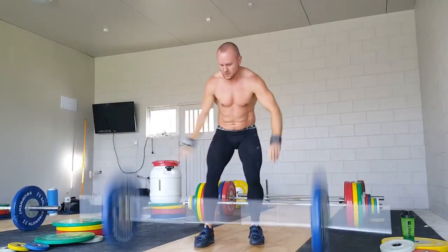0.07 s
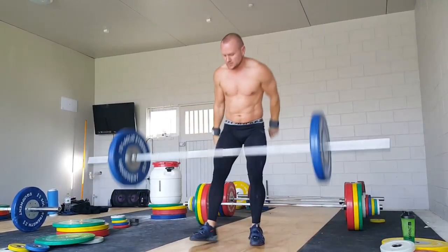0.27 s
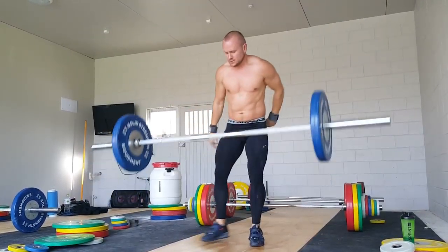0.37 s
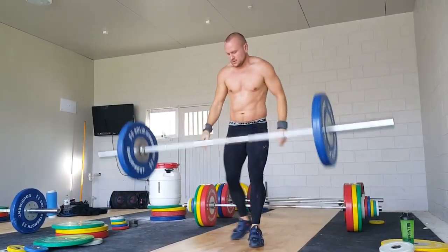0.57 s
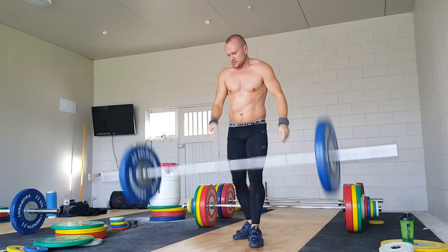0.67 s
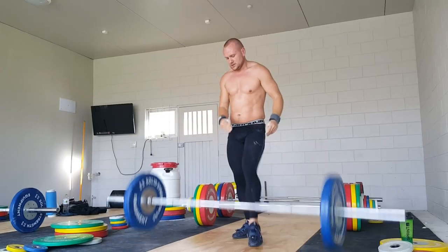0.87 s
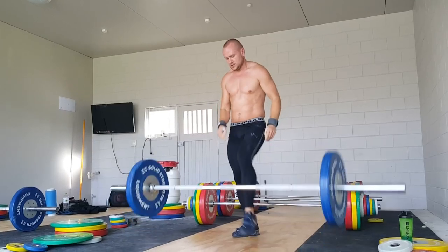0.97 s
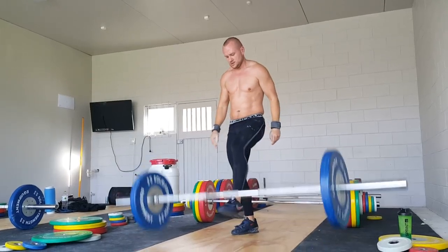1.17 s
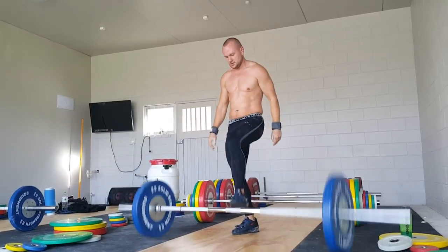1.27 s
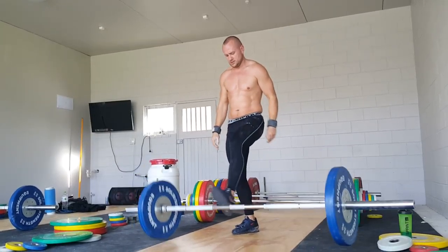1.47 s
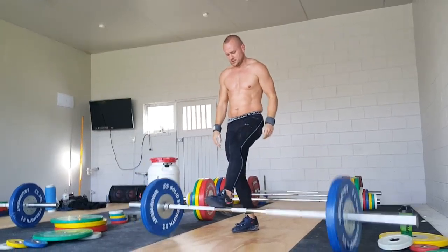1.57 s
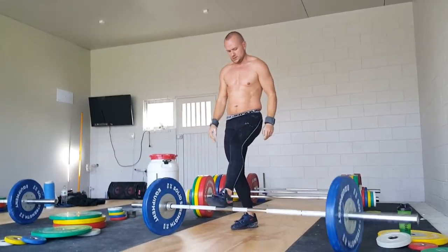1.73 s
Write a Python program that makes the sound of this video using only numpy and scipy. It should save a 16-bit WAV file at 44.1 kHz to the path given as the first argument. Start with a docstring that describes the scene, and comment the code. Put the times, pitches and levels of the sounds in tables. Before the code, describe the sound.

Loaded barbell crashes down on a wooden gym floor, steel sleeves clanging through shrinking bounces in a ringing room

```python
"""In a hard-walled gym, an earlier noise fades away over a lumpy low rumble and steady air.
A barbell with rubber plates then lands on a wooden platform: a low push of dying tones and a swelling boom.
Right after, the loose steel sleeves clatter and clang, made of random knocks and ringing filters; the room rings on.
The bar bounces three times, each with its own thud and clatter, and then rolls with sharp ticks and thin rings.
A small two-port microphone hears it all, and its gain control turns loud moments down and recovers slowly."""
import sys
import numpy as np
from scipy import signal
from scipy.fft import rfft, irfft
from scipy.io import wavfile
from scipy.ndimage import uniform_filter1d

SR = 44100
rng = np.random.default_rng(int(sys.argv[2]) if len(sys.argv) > 2 else 0)


def unload_wav(signal):
    """Save mono or channel-first audio to the path in sys.argv[1] as 16-bit WAV at rate SR, clipped to [-1, 1]."""
    wavfile.write(
        sys.argv[1],
        SR,
        np.round(np.clip(np.atleast_2d(signal).T, -1, 1) * 32767).astype(np.int16),
    )


N = 103105
TIME = np.arange(N) / SR  # seconds

# Background colour. Each row: frequency in Hz, relative level in dB per Hz.
RUMBLE_COLOUR = [(15, -40), (32, -7.5), (48, -20), (65, 1), (85, -5), (120, -7.5), (160, -8.5), (250, -13),
                 (390, -18), (500, -28), (3160, -70), (5000, -33.5), (16000, -51)]
# Loudness of the rumble over time. Each row: time in seconds, level in dB.
RUMBLE_LEVEL = [(0, -30), (.15, -26), (.22, -16.5), (.3, -54), (.35, -18), (.43, -21), (.53, -19.5),
                (.62, -25.5), (.75, -29), (.92, -25), (1.01, -39), (1.1, -30.5), (1.31, -33), (1.65, -36),
                (1.86, -31), (1.96, -31), (2.02, -19.5), (2.09, -27), (2.16, -23), (2.22, -31),
                (2.34, -32.5)]
AIR_DB = -39.5  # steady part of the background above the rumble
RUMBLE_TOP_HZ = 130  # the rumble hands over to the air here
FADING_DB, FADING_DB_PER_S = -33, -54  # an earlier noise dying in the room
# How alike left and right are. Each row: frequency in Hz, likeness from 0 to 1.
LIKENESS = [(60, 0.97), (180, 1), (550, 0.8), (1400, 0)]

# The fall and the bounces. Each row: start in seconds, thud level in dB, thud tilt in dB per octave,
# boom level in dB, boom centre in Hz, boom spread in octaves, boom swell time in seconds,
# time for the boom to fall 60 dB in seconds, crack level in dB.
LANDINGS = [(0.1645, -11, -1, -14.5, 336, 0.6, 0.095, 0.96, -8),
            (.876, -19.5, -14, -7.5, 411, 0.33, 0.1, 0.48, -16),
            (1.322, -31, -1, -10.5, 370, 0.58, 0.046, 0.32, -15.5),
            (1.589, -30, 0, -35, 600, .6, 0.057, 0.24, -19)]
# Tones of the plates pushing the platform. Each row: pitch in Hz, level in dB, time to fall 60 dB in seconds.
THUD_TONES = [(82.4, -10, 0.29), (116.7, 2, 0.17), (164, -3.5, 0.14), (210, 1.5, 0.11), (252, 0, 0.1)]
# Resonances of platform and plates. Each row: pitch in Hz, width in Hz, relative level in dB.
BOARDS = [(261, 40, 10), (348.9, 10.4, 1.5), (409, 17, -1), (523, 58, 6), (586, 50, 7), (780, 60, -4)]

# Sleeves and plates knocking on the bar. Each row: time in seconds, force in dB.
CLATTER_FORCE = [(.166, -53), (.17, -18), (.19, -6.5), (.225, -14.5), (.31, -13), (.5, -31), (.65, -47),
                 (.874, -43), (.882, -15.5), (.9, -10), (.93, -18.5), (1.0, -19.5), (1.06, -20),
                 (1.17, -24), (1.316, -40), (1.328, -17.5), (1.355, -19.5), (1.43, -18), (1.57, -27),
                 (1.6, -18.5), (1.68, -19), (1.78, -17.5), (1.92, -21), (2.1, -22.5), (2.2, -28.5),
                 (2.34, -56)]
KNOCKS_PER_S, KNOCK_SPREAD_DB = 2500, 3
CLUMP_DB, CLUMP_S = 4.5, 0.0092  # uneven force: its depth, and the time it is smoothed over
CRACK_LAG_S, CRACK_FADE_S = 0.0017, 0.0046
# Brightness of the knocks. Each row: time in seconds, treble gain in dB.
TREBLE = [(.166, 2.5), (.26, 0.5), (.33, -6), (.876, -4), (.9, 4), (1.0, 4.5), (1.2, -2.5), (1.318, 6.5),
          (1.55, 4.5), (1.6, 5.5), (2.1, -1), (2.3, 3.5)]
TREBLE_HZ = 6450
# Colour of the broad clank. Each row: frequency in Hz, relative level in dB per Hz.
CLANK_COLOUR = [(88, -56), (150, -15.5), (321, -3.5), (979, -11.5), (1290, -5), (1660, -6), (3160, -4.5),
                (5050, -12), (6020, -12), (7700, -14.5), (8800, -24), (10200, -16.5), (12500, -25),
                (14600, -17.5), (16000, -16.5)]
# Ringing modes of the steel. Each row: pitch in Hz, width in Hz, relative level in dB.
STEEL_MODES = [(1390, 490, -6), (1965, 72, -9), (2250, 34, -6), (2770, 300, -35), (3104, 30, -2.5),
               (3370, 200, -0.5), (3740, 260, -12.5), (4400, 76, -19), (5920, 88, -5), (10200, 310, -13)]
STEEL_DB = -5
BLOWS_PER_S, BLOW_SPREAD_DB = 150, 6  # fewer, harder blows ring each mode on its own
# Thin rings of the rolling bar. Each row: pitch in Hz, width in Hz, relative level in dB.
ROLL_RINGS = [(3020, 45, -21), (5850, 230, -8), (14420, 45, -12)]
ROLL_FROM_S, ROLL_RISE_S = 1.66, 0.22
# High ring of the bouncing bar: only the lighter bounces free it, and it weakens once the bar rolls.
SING_HZ, SING_WIDTH_HZ, SING_DB = 14010, 75, -9.5
SING_FROM_S, SING_LEFT = 0.8, 0.55  # start, and the share left in the roll

# Short bursts at one pitch: clangs, low knocks and booming bursts.
# Each row: start in seconds, level in dB, pitch in Hz.
BURSTS = [(0.171, -19, 4400), (.184, -12, 3480), (.187, -15, 14300), (.194, -12, 3770), (.196, -20, 2670),
          (.217, -17, 3500), (.245, -25, 3000), (.29, -15, 2230), (.91, -18, 1950), (0.927, -16, 3100),
          (0.942, -14, 3240), (.945, -17, 397), (0.984, -17, 3350), (.998, -17.5, 2430),
          (1.026, -21.5, 395), (1.347, -16, 3950), (1.411, -18, 3100), (1.428, -14, 3220),
          (1.432, -20, 394), (1.437, -23, 2300), (1.467, -32, 2140), (1.597, -22, 2440), (1.641, -27, 3330),
          (1.713, -21, 1340), (1.737, -16, 3300), (1.776, -20.5, 1340), (1.915, -21, 1270)]
BURST_PEAK_S, BURST_WIDTH_HZ = 0.005, 420

# Echo time of the gym. Each row: frequency in Hz, time to fall 60 dB in seconds.
GYM_FADE = [(100, 0.69), (400, 1.0), (1500, 0.8), (4000, 0.81), (8000, 0.69), (15000, 0.29)]
GYM_DB, GYM_DELAY_S = -1, 0.006
TURNS_PER_S = 7  # how often three echo tails trade places, keeping the echo even
PING_ROOM_DB = -12  # how much of the bursts and ticks reaches the room

# Single sharp knocks. Each row: start in seconds, level in dB, pitch in Hz.
TICKS = [(1.679, -16, 700), (1.688, -16, 8300), (1.762, -17, 7000), (2.126, -22, 9500)]
TICK_CYCLES = 1.2  # cycles until a tick peaks

# Colour of the two ports. Each row: frequency in Hz, left-over-right tilt in dB (record() shares it out).
PORT_TILT = [(60, 0), (500, 3), (1170, 2.5), (1790, 2.0), (2740, 6.5), (4190, -3.5), (6410, 8.5),
             (9810, -4), (15000, 10)]
KNEE_DB, SQUEEZE, RECOVER_DB_PER_S = -20.5, 0.25, 13  # SQUEEZE: dB turned down per dB above the knee
EDGE_HZ = 15730  # top of the recorded band


def amp(db):
    """Turn decibels into a plain factor."""
    return 10 ** (np.asarray(db) / 20)


def evened(x):
    """Scale a sound to an average power of 1."""
    return x / np.sqrt(np.mean(x ** 2) + 1e-20)


def read(points, hz):
    """Read a table between its rows, along a logarithmic pitch scale."""
    f, value = np.transpose(points)
    return np.interp(np.log(hz + 1), np.log(f + 1), value)


def curve(table):
    """Draw straight lines through a table of times and values."""
    seconds, value = np.transpose(table)
    return np.interp(TIME, seconds, value)


def add(mix, s, sound):
    """Add a sound into the mix from a start time in seconds."""
    part = mix[round(s * SR):][:len(sound)]
    part += sound[:len(part)]


def colour(x, points, scale=1):
    """Filter a sound by a dB table, without any sound coming before its cause."""
    gain = amp(scale * read(points, np.fft.rfftfreq(4096, 1 / SR)))
    # folding the cepstrum forward in time gives the filter its earliest possible response
    cepstrum = irfft(np.log(gain))
    cepstrum[1:2048] *= 2
    cepstrum[2049:] = 0
    return signal.oaconvolve(x, irfft(np.exp(rfft(cepstrum))))[:N]


def ring(x, hz, width):
    """Let one pitch ring: a two-pole resonance with a gain of 1 at its peak."""
    return signal.lfilter(*signal.iirpeak(hz, hz / width, SR), x)


def mode(x, hz, width, db):
    """Ring one steel mode, with narrow modes raised to make up for the little they let through."""
    return amp(db) * np.sqrt(2000 / width) * ring(x, hz, width)


def pair(size):
    """Make the spectra over time of two noises, as alike as two close ports hear them."""
    a, b = signal.stft(rng.standard_normal((2, size)), SR, nperseg=4096)[2]
    hz = np.fft.rfftfreq(4096, 1 / SR)
    same = np.clip(read(LIKENESS, hz), 0, 1)[:, None]
    return hz, np.array([a, same * a + np.sqrt(1 - same ** 2) * b])


def background():
    """Noise split into a lumpy low rumble and steady air, plus an earlier noise that fades evenly in dB."""
    hz, spectrum = pair(N)
    spectrum = spectrum * amp(read(RUMBLE_COLOUR, hz))[:, None]
    low = 1 / (1 + (hz[:, None] / RUMBLE_TOP_HZ) ** 4)
    rumble = evened(signal.istft(spectrum * low, SR, nperseg=4096)[1][:, :N])
    air = evened(signal.istft(spectrum * (1 - low), SR, nperseg=4096)[1][:, :N])
    dull_noise = signal.lfilter([1], [1, -0.9], rng.standard_normal((2, N)))
    hiss = ring(rng.standard_normal((2, N)), 7300, 900)
    wash = evened(dull_noise + 2.3 * hiss) * amp(FADING_DB + FADING_DB_PER_S * TIME)
    return rumble * amp(curve(RUMBLE_LEVEL)) + air * amp(AIR_DB) + wash


def landings():
    """Plates push the platform with low dying tones, then a swelling boom shakes the boards."""
    out, t = np.zeros(N), np.arange(SR) / SR
    for s, thud_db, tilt_db, boom_db, centre_hz, octaves, swell_s, fade_s, _ in LANDINGS:
        push = np.zeros(SR)
        for hz, db, ring_s in THUD_TONES:
            tilt = tilt_db * np.log2(hz / THUD_TONES[1][0]).clip(0)  # only above the second tone
            push -= amp(db + tilt - 60 * t / ring_s) * np.sin(2 * np.pi * hz * t)
        shake = rng.standard_normal(SR)
        boom = np.zeros(SR)
        for hz, width, db in BOARDS:
            away = np.log2(hz / centre_hz) / octaves
            boom += amp(db - 15.8 * away ** 2) * evened(ring(shake, hz, width))
        swell = 1 - np.exp(-(t / swell_s) ** 4)
        boom = evened(boom) * amp(boom_db - 60 * t / fade_s) * swell
        add(out, s, amp(thud_db) * push + boom)
    return out


def clatter():
    """One end of the bar: uneven, clumped knocks make a broad clank, and steel modes ring with them."""
    sizes = amp(KNOCK_SPREAD_DB * np.minimum(rng.exponential(1, N), 5)) * rng.choice([-1., 1.], N)
    knocks = sizes * (rng.random(N) < KNOCKS_PER_S / SR)
    span = round(CLUMP_S * SR)
    clumps = evened(uniform_filter1d(uniform_filter1d(rng.standard_normal(N), span), span))
    force_db = curve(CLATTER_FORCE)
    knocks = evened(knocks * amp(CLUMP_DB * clumps)) * amp(force_db)
    # each landing adds a short crack of noise
    t = np.arange(400) / SR
    for s, *_, crack_db in LANDINGS:
        crack = rng.standard_normal(400) * np.exp(-t / CRACK_FADE_S)
        add(knocks, s + CRACK_LAG_S, amp(crack_db) * crack)
    dull = signal.lfilter(*signal.butter(2, TREBLE_HZ, fs=SR), knocks)
    knocks = dull + amp(curve(TREBLE)) * (knocks - dull)
    # separate random blows ring each steel mode
    steel = np.zeros(N)
    force = amp(force_db + STEEL_DB + CLUMP_DB * clumps)
    for hz, width, db in STEEL_MODES:
        blows = (rng.random(N) < BLOWS_PER_S / SR) * amp(BLOW_SPREAD_DB * rng.standard_normal(N))
        steel += mode(evened(blows) * force, hz, width, db)
    rolling = np.clip((TIME - ROLL_FROM_S) / ROLL_RISE_S, 0, 1)
    for hz, width, db in ROLL_RINGS:
        steel += mode(knocks * rolling, hz, width, db)
    singing = np.where(TIME < SING_FROM_S, 0, 1 - rolling * (1 - SING_LEFT))
    steel += mode(knocks * singing, SING_HZ, SING_WIDTH_HZ, SING_DB)
    # dividing by the filter's response to one click keeps the clank's overall strength at 1
    click = np.zeros(N)
    click[0] = 1
    clank = colour(knocks, CLANK_COLOUR) / np.linalg.norm(colour(click, CLANK_COLOUR))
    return clank + steel


def bursts():
    """Clangs, low knocks and booming bursts: short noise rung twice at one pitch, swelling and dying."""
    out, u = np.zeros(N), np.arange(2500) / SR / BURST_PEAK_S
    for s, db, hz in BURSTS:
        rattle = rng.standard_normal(2500)
        for _ in range(2):
            rattle = ring(rattle, hz, BURST_WIDTH_HZ)
        add(out, s, amp(db) * evened(rattle) * u * np.exp(1 - u))
    return out


def tail():
    """A dense echo of noise, each pitch band dying at its own speed."""
    _, spectrum = pair(SR)
    noise = signal.istft(spectrum, SR, nperseg=4096)[1][:, :SR]
    hz, t, bands = signal.stft(noise, SR, nperseg=256)
    fade = amp(-60 * t / read(GYM_FADE, hz)[:, None])
    out = signal.istft(bands * fade, SR, nperseg=256)[1]
    return np.pad(out, ((0, 0), (round(GYM_DELAY_S * SR), 0))) / np.linalg.norm(out[0])


def gym(x):
    """The hard walls answer with three echo tails that trade places, which keeps the echo even."""
    turn = 2 * np.pi * TURNS_PER_S * TIME
    out = np.zeros((2, N))
    for k in range(3):
        share = np.sqrt(2 / 3) * np.cos(turn + k * np.pi / 3)
        out += signal.fftconvolve((x * share)[None], tail(), axes=1)[:, :N]
    return out


def ticks():
    """Sharp knocks: sine tones that swell and die within a few cycles."""
    out, t = np.zeros(N), np.arange(800) / SR
    for s, db, hz in TICKS:
        u = t * hz / TICK_CYCLES
        add(out, s, amp(db) * np.sin(2 * np.pi * hz * t) * u * np.exp(1 - u))
    return out


def scene():
    """Mix the direct sounds, their echoes and the background; each port hears some of the far bar end."""
    low = landings()
    ends = np.array([clatter(), clatter()])
    pings = bursts() + ticks()
    near = amp(-3.0) * (ends + 0.22 * ends[::-1]) + pings
    to_room = amp(-2) * ends.sum(0) + amp(PING_ROOM_DB) * pings + amp(-1.5) * low
    return low + near + amp(GYM_DB) * gym(to_room) + background()


def record(dry):
    """The microphone colours each port, turns loud moments down, clips softly and cuts the top."""
    left = colour(dry[0], PORT_TILT, scale=0.47)
    right = colour(dry[1], PORT_TILT, scale=-0.39)
    ports = np.array([left, right])
    power = uniform_filter1d((ports ** 2).mean(0), 600)
    power_db = 10 * np.log10(abs(power) + 1e-12)
    # the held level jumps up at once and falls back slowly
    fall = RECOVER_DB_PER_S * TIME
    held_db = np.maximum.accumulate(power_db + fall) - fall
    over_db = np.maximum(held_db - KNEE_DB, 0)
    ducked = np.tanh(ports / amp(SQUEEZE * uniform_filter1d(over_db, 200)))
    top_cut = signal.firwin(511, EDGE_HZ, window=("kaiser", 9), fs=SR)
    return signal.oaconvolve(ducked, top_cut[None], "same")


dry = scene()
out = record(dry)
unload_wav(out)
```